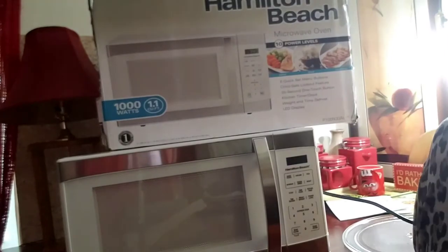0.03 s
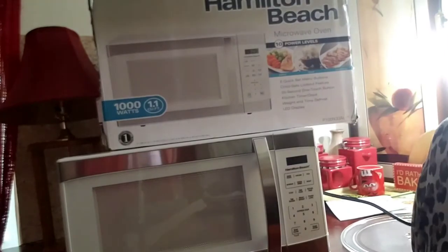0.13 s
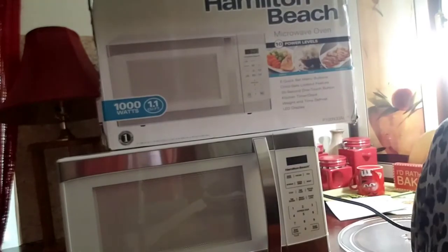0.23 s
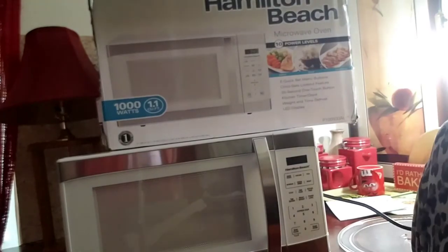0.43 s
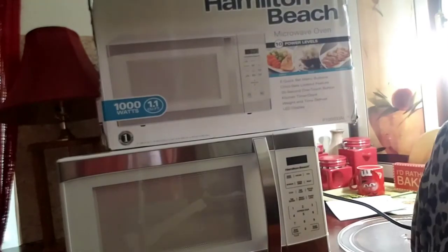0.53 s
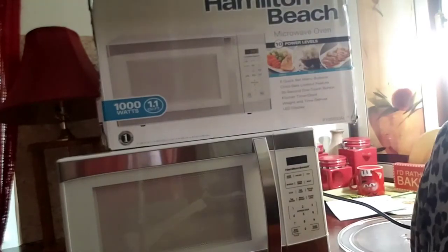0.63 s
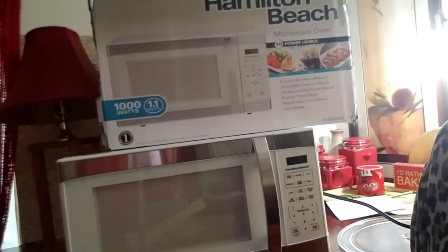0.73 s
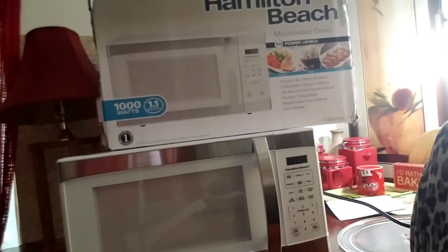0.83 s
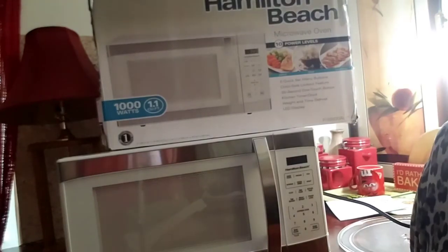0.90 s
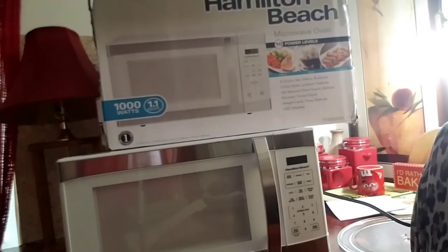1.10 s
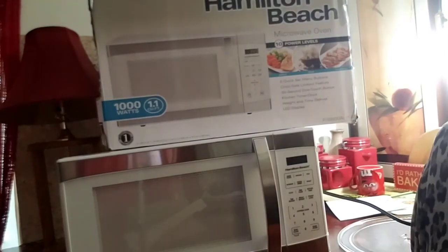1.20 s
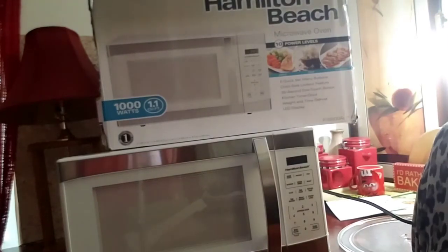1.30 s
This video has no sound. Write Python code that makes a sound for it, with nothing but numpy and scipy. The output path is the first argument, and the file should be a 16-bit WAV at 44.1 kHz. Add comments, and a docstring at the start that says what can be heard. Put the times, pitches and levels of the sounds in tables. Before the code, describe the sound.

A microwave door is pushed shut with a brief scrape, a loud thud and a latch snap. The metal body rings and rattles briefly, then a few light bumps and ticks follow nearby in a quiet kitchen.

```python
"""A microwave oven door is pushed shut in a quiet kitchen, over a low hum and faint hiss.
Loose parts stir, then the latch hooks stick and slip up their ramps. At 0.2 s the door slams on its
frame and chatters while the hooks snap in and their springs ring. The steel cabinet booms and rings
in the room, and the oven thumps and wobbles on its feet. A short rattle follows, then a few light
bumps and ticks of handling."""
import sys
import numpy as np
from scipy import signal
from scipy.fft import rfft, irfft
from scipy.io import wavfile

SR = 44100
rng = np.random.default_rng(int(sys.argv[2]) if len(sys.argv) > 2 else 0)


def wrap_up_sound(samples):
    """Save the sound to the file named by the first command line argument, as 16-bit audio."""
    columns = np.atleast_2d(samples).T
    # keep every value between -1 and 1, then stretch to whole-number steps
    tamed = np.clip(columns, -1, 1)
    steps = np.round(tamed * 32767).astype(np.int16)
    wavfile.write(sys.argv[1], SR, steps)


N = 59535
TIME = np.arange(N) / SR
FFT_SIZE = 2 ** 16
FREQS = np.maximum(np.fft.rfftfreq(FFT_SIZE, 1 / SR), 1)
SIDES = np.array([[1], [-1]])   # left, right


def from_db(db):
    """Decibels to gain."""
    return 10 ** (np.asarray(db) / 20)


def at_hz(curve, hz):
    """Read a curve on a log-frequency axis."""
    freqs, values = np.transpose(curve)
    return np.interp(np.log(hz), np.log(freqs), values)


def clicks(times, db):
    """One click for each contact."""
    out = np.zeros(N)
    samples = np.round(np.asarray(times) * SR).astype(int)
    np.add.at(out, np.clip(samples, 0, N - 1), from_db(db))
    return out


def envelope(hits, t60, attack_s):
    """Amplitude of a vibration whose energy builds after each hit and dies away."""
    decay, lag = from_db(-120 / (t60 * SR)), np.exp(-1 / (attack_s * SR))
    energy = signal.lfilter([1], [1, -decay], hits ** 2 + 1e-18)
    return np.sqrt(signal.lfilter([1 - lag], [1, -lag], energy))


# Stereo image, narrow lows and wide highs: (frequency [Hz], left-right correlation [0-1])
CORRELATION = [(60, 0.86), (160, .96), (350, .75), (700, 0.4), (1400, 0.5), (3000, 0.08), (12000, 0)]
def diffuse(gain):
    """Spectrum of coloured stereo noise of unit rms, arriving from all round the room."""
    mid, side = rfft(rng.standard_normal((2, FFT_SIZE)))
    alike = at_hz(CORRELATION, FREQS)
    return rms_one(gain) * (np.sqrt((1 + alike) / 2) * mid + np.sqrt((1 - alike) / 2) * side * SIDES)


def rms_one(x):
    """Scale to unit rms."""
    return x / np.sqrt(np.mean(x ** 2) + 1e-20)


def room_noise(eq):
    """Steady diffuse noise through an EQ curve."""
    return irfft(diffuse(from_db(at_hz(eq, FREQS))))[:, :N]


# The oven's pan, mostly a little right: (frequency [Hz], left minus right [dB])
PAN = [(100, -1.5), (700, -2.1), (2500, -2.1), (5000, -3), (9000, -8), (14000, 1)]
LEFT_LEAD_S = .00018
def pan(hz):
    """Left and right gains of the oven at this frequency."""
    return from_db(SIDES * at_hz(PAN, hz) / 2)


def ringing(hits, modes):
    """Lightly damped modes, fed by every hit and heard in a different phase on each side."""
    out = np.zeros((2, N))
    for hz, db, t60 in modes:
        tone = np.sin(2 * np.pi * (hz * TIME + rng.random((2, 1))))
        out += from_db(db) * envelope(hits, t60, attack_s=.002) * tone * pan(hz)
    return out


def ripple(depth_db=2.4, width_hz=28):
    """Narrow peaks and dips from the casing's crowded resonances."""
    knots = np.linspace(0, SR / 2, int(SR / 2 / width_hz))
    return from_db(depth_db * np.interp(FREQS, knots, rng.standard_normal(len(FREQS))[:len(knots)]))


def crack(gain):
    """Spectrum of the tightest transient with this colour: a minimum-phase pulse."""
    cepstrum = irfft(np.log(rms_one(gain)))
    cepstrum[1:] *= 2
    cepstrum[FFT_SIZE // 2:] = 0
    return np.exp(rfft(cepstrum))


# The kitchen's reverb, longest in the lows: (frequency [Hz], t60 [s])
REVERB = [(60, 1.0), (170, 0.66), (400, 0.4), (1000, 0.32), (2500, 0.34), (5000, 0.3), (12000, .3)]
def contacts(hits, eq, crack_db, body_t60, attack_s, room_db, build_s):
    """Each contact gives a sharp crack, a short dense ring of the struck part and a room tail."""
    gain = from_db(at_hz(eq, FREQS))
    position = pan(FREQS) * np.exp(1j * np.pi * SIDES * FREQS * LEFT_LEAD_S)
    wash = diffuse(gain * ripple()) * position
    out = from_db(crack_db) * irfft(rfft(hits, FFT_SIZE) * crack(gain) * position)[:, :N]
    body = envelope(hits, body_t60, attack_s)
    centres, t60s = np.transpose(REVERB)
    for share, t60 in zip(np.eye(len(centres)), t60s):
        band = irfft(wash * np.interp(np.log(FREQS), np.log(centres), share))[:, :N]
        tail = from_db(room_db) * envelope(hits, t60, build_s)
        out += band * np.hypot(body, tail)
    return out


# Dark noise bed with a trace of hiss: (frequency [Hz], relative level [dB])
ROOM_TONE_EQ = [(20, -23), (45, -10.5), (75, -10), (110, -6.5), (150, -3), (200, -2.5), (250, -4),
                (330, -2), (450, -10.5), (650, -14), (1000, -20), (2000, -26.5), (4000, -28), (6500, -30),
                (8300, -23.5), (10000, -29.5), (15000, -33)]
# Two low hum tones: (frequency [Hz], rms level [dB])
HUM_TONES = [(156, -65.5), (204.6, -59)]
def room_tone():
    """The kitchen's steady bed of low noise, hum and hiss."""
    hum = sum(from_db(db) * np.sqrt(2) * np.sin(2 * np.pi * (hz * TIME + rng.random()))
              for hz, db in HUM_TONES)
    return hum + from_db(-54.5) * room_noise(ROOM_TONE_EQ)


# Loose parts rattle, then the oven is bumped lightly: (time [s], relative level [dB])
BUMP_CUES = [(.002, -52), (0.315, -25.5), (.330, -30), (0.378, -33), (.424, -43.5), (.506, -42),
             (.514, -43), (0.55, -41.5), (0.585, -49.5), (0.682, -52.5), (1.027, -46), (1.054, -51.5),
             (1.143, -47), (1.148, -50), (1.182, -54), (1.24, -57), (1.323, -67)]
# Dull, boxy knock: (frequency [Hz], relative level [dB])
BUMP_EQ = [(20, -19), (50, -5), (160, 6.5), (230, -2), (450, -3.5), (900, 0.5), (1300, 3.5), (1570, -5.5),
           (1850, 0.5), (2600, -5), (4000, -19), (9000, -26), (12000, -39)]
# The casing's hollow clack: (frequency [Hz], relative level [dB], t60 [s])
CASING_RING = [(950, -21, 0.16), (1310, -8, 0.23), (1920, -13.5, 0.13), (2130, -19, .14), (2500, -14, .14),
               (3074, -15.5, 0.14)]
# Small sharp ticks: (time [s], relative level [dB])
TICK_CUES = [(0.378, -50), (.548, -61.5), (0.683, -52), (0.696, -56.5), (1.032, -57), (1.055, -51.5),
             (1.291, -64)]
# Thin, bright click: (frequency [Hz], relative level [dB])
TICK_EQ = [(300, -4), (1400, 3.5), (2200, -4.5), (2900, 1.5), (5500, -10), (8800, -2.5), (11000, -14.5),
           (15000, -18)]
# The ping after a tick: (frequency [Hz], relative level [dB], t60 [s])
TICK_RING = [(2600, -7.5, 0.17), (3360, -21, 0.24)]
def handling():
    """Rattles, soft bumps and sharper ticks strike the casing and leave it ringing briefly."""
    bump_hits, tick_hits = clicks(*np.transpose(BUMP_CUES)), clicks(*np.transpose(TICK_CUES))
    rings = from_db(-2.5) * ringing(bump_hits, CASING_RING) + ringing(tick_hits, TICK_RING)
    bumps = contacts(bump_hits, BUMP_EQ, crack_db=14, body_t60=.08, attack_s=.0018,
                     room_db=-10.5, build_s=.0063)
    ticks = contacts(tick_hits, TICK_EQ, crack_db=13, body_t60=.16, attack_s=.0006,
                     room_db=-8.5, build_s=.01)
    return rings + bumps + ticks


# The hooks rub up their ramps, louder each time: (time [s], length [s], relative level [dB])
SLIDE_CUES = [(0.065, 0.063, -49.5), (0.1399, .016, -38.5), (.156, .062, -34.5)]
# Midrange scrape: (frequency [Hz], relative level [dB])
SLIDE_EQ = [(40, -17.5), (100, -8.5), (170, -2.5), (400, -8.5), (530, -2.5), (780, -10), (1100, -0.5),
            (1600, -10.5), (2100, -8), (3000, -10), (4300, -21), (6500, -27.5), (8200, -19), (9800, -27.5),
            (11500, -44)]
# The latch springs snap: (time [s], relative level [dB])
SNAP_CUES = [(0.2184, -25), (0.221, -19.5), (.238, -21), (.250, -26.5)]
# Crisp snap with a bright edge: (frequency [Hz], relative level [dB])
SNAP_EQ = [(500, -11), (1500, -4.5), (2600, 2.5), (4600, -1.5), (5200, -4.5), (6800, -12), (8400, -2),
           (9700, -12.5), (10800, -19), (15000, -37)]
# High zing of springs and hooks: (frequency [Hz], relative level [dB], t60 [s])
SPRING_RING = [(2843, -11, .28), (4740, -18, 0.13), (4880, -14.5, 0.24), (6205, -10.5, .27),
               (6800, -15, 0.2), (7390, -20, 0.24), (8150, -20.5, .2), (8730, -18, 0.22)]
def latch(slips_per_s=1400, spread_db=3):
    """The hooks stick and slip along their ramps, then snap home and ring."""
    slips = np.zeros(N)
    for start, length, db in SLIDE_CUES:
        count = int(length * slips_per_s)
        jitter, size = rng.random(1000)[:count], rng.standard_normal(1000)[:count]
        times = start + length * (np.arange(count) + jitter) / count
        slips += clicks(times, db - 11 + spread_db * size)
    friction = slips * rng.choice([-1, 1], N)
    scrape = contacts(friction, SLIDE_EQ, crack_db=15, body_t60=.051, attack_s=.0005,
                      room_db=-12, build_s=.013)
    snap_hits = clicks(*np.transpose(SNAP_CUES))
    springs = from_db(-4) * ringing(snap_hits + from_db(-12) * slips, SPRING_RING)
    snaps = contacts(snap_hits, SNAP_EQ, crack_db=15, body_t60=.1, attack_s=.0025,
                     room_db=-6.5, build_s=.0097)
    return scrape + springs + snaps


def resonator(hits, hz, t60):
    """Each click starts a decaying sine of its own height."""
    radius, angle = from_db(-60 / (t60 * SR)), 2 * np.pi * hz / SR
    return signal.lfilter([0, np.sin(angle)], [1, -2 * radius * np.cos(angle), radius ** 2], hits + 1e-18)


# Dry knock of the door's front panel: (frequency [Hz], relative level [dB], t60 [s])
PANEL_RING = [(876, -18, .04), (1095, 9, 0.02), (1200, 7, 0.024), (2030, -17.5, .03)]
def front_panel(hits, rise_t60=.0092):
    """The heavily damped panel rings; subtracting a shorter ring rounds off the attack."""
    knock = sum(from_db(db) * (resonator(hits, hz, t60) - resonator(hits, hz, rise_t60))
                for hz, db, t60 in PANEL_RING)
    delayed = np.interp(TIME - LEFT_LEAD_S, TIME, knock)
    return pan(hz=1095) * np.array([knock, delayed])   # panned as its strongest mode


# The slam and its chatter: (time [s], relative level [dB], panel drive [dB])
SLAM_CUES = [(0.2064, -41, -29.5), (0.2127, -29, -27), (0.2257, -19.5, -8.5), (0.2357, -21, -19.5),
             (.2445, -20.5, -28.5), (0.251, -16, -39), (.256, -17.5, -30), (0.2598, -19, -15.5),
             (.2685, -25, -24), (.278, -28.5, -21)]
# Full-bodied slam with a hard midrange: (frequency [Hz], relative level [dB])
SLAM_EQ = [(20, -46), (33, -32.5), (50, -13.5), (80, -17.5), (150, -9.5), (230, -8), (300, -10),
           (400, -8.5), (650, -10), (1150, 1), (1400, -0.5), (1600, -7), (1850, -4), (2600, -6.5),
           (4000, -20.5), (9000, -22), (11500, -45.5)]
def door():
    """The door hits its frame and chatters; each blow also rings the front panel."""
    times, db, panel_db = np.transpose(SLAM_CUES)
    slam = contacts(clicks(times, db), SLAM_EQ, crack_db=13.5, body_t60=.06, attack_s=.0008,
                    room_db=-9, build_s=.008)
    return slam + front_panel(clicks(times, panel_db))


# Boom and metallic ring of the steel shell: (frequency [Hz], relative level [dB], t60 [s])
CABINET_RING = [(47.9, -46.5, 0.68), (75.2, -46.5, 1), (152.5, -33, 0.74), (204, -49, 0.77),
                (275.9, -32, 0.45), (303.3, -38, 0.69), (380, -39.5, 0.6), (552, -33.5, .4),
                (653.6, -27.5, 0.38), (770.7, -21.5, 0.29), (877, -23.5, 0.25), (1025, -22.5, 0.33),
                (1147, -30.5, 0.23), (1170, -25, .32), (1205, -27, .3), (1290, -22, 0.3),
                (1795, -23.5, 0.27), (2117, -26.5, 0.24), (2497, -24, .28)]
CABINET_PAN = from_db(-.4 * SIDES)   # a touch to the right
def cabinet(start_s=.224, attack_s=.01):
    """The slam sets the steel shell ringing, its higher modes wider in the stereo image."""
    age = np.maximum(TIME - start_s, 0)
    out = np.zeros((2, N))
    for hz, db, t60 in CABINET_RING:
        phase = SIDES * np.arccos(at_hz(CORRELATION, hz)) / 2
        out += from_db(db - 60 * age / t60) * np.sin(2 * np.pi * hz * age + phase)
    return out * (1 - np.exp(-age / attack_s)) * CABINET_PAN


def thump(peak_s=.2555, hz=161.3, swell_s=.012, t60=.09):
    """The whole oven rocks once as the door seats: one deep thump."""
    age = TIME - peak_s
    swell = np.exp(np.minimum(age, 0) / swell_s)
    decay = from_db(-60 * np.maximum(age, 0) / t60)
    return from_db(-20) * swell * decay * np.sin(2 * np.pi * hz * age) * CABINET_PAN


# Sub-bass rumble: (frequency [Hz], relative level [dB])
WOBBLE_EQ = [(20, -30), (35, -8), (50, -3), (75, -1), (110, -19), (220, -43), (1000, -80)]
def wobble():
    """The oven wobbles on its feet after the slam: a rumble that swells and dies."""
    jolt = clicks(times=[.33], db=[-47.5])
    return room_noise(WOBBLE_EQ) * envelope(jolt, t60=.45, attack_s=.043)


def scene():
    """The closing door and the oven's response, over the kitchen's room tone."""
    return room_tone() + door() + cabinet() + thump() + handling() + latch() + wobble()


def record(dry, cutoff_hz=15400):
    """A steep low-pass takes off the very top."""
    return signal.sosfilt(signal.ellip(12, .2, 90, cutoff_hz, fs=SR, output="sos"), dry)


dry = scene()
out = record(dry)
wrap_up_sound(out)
```